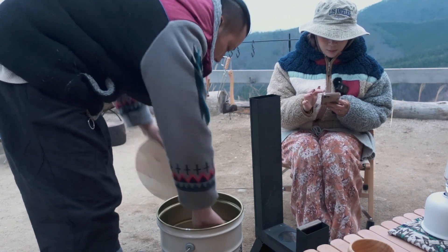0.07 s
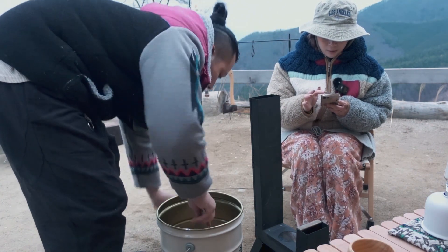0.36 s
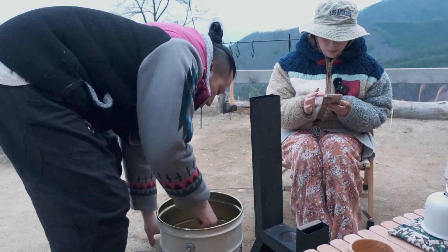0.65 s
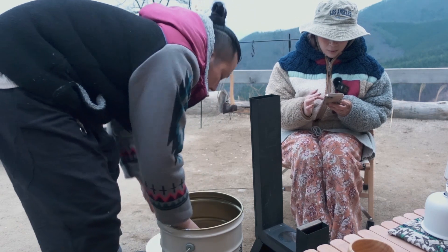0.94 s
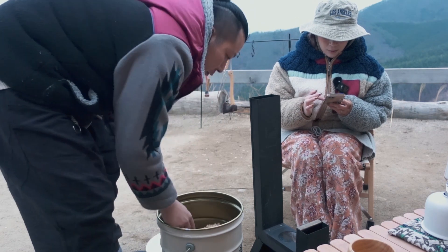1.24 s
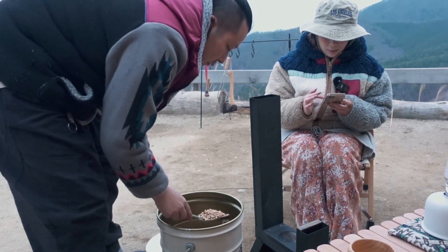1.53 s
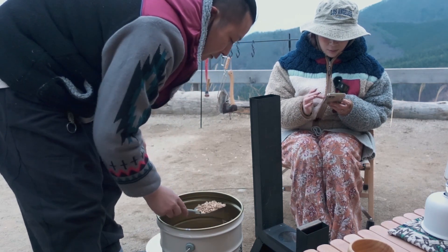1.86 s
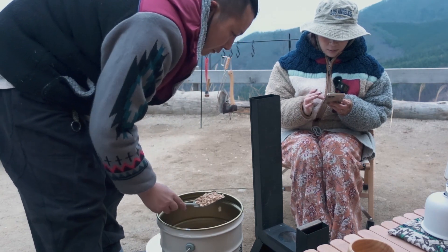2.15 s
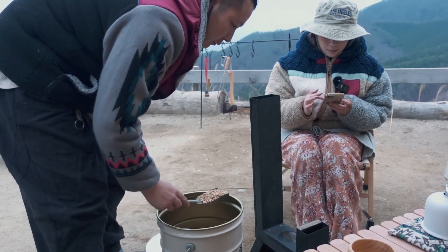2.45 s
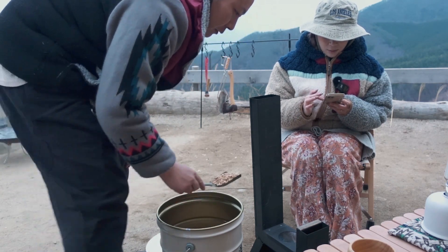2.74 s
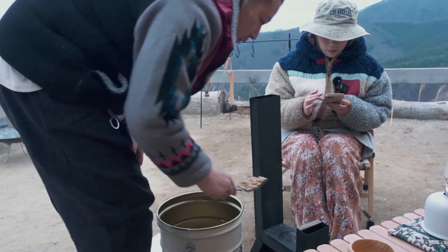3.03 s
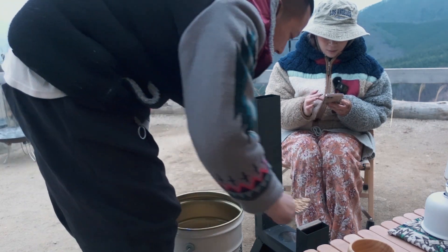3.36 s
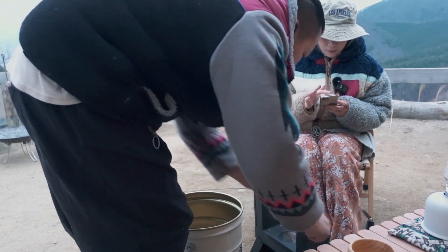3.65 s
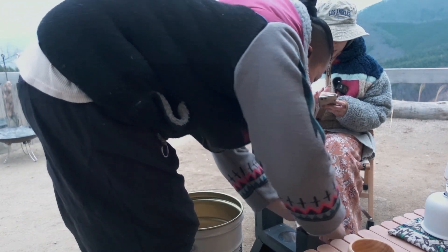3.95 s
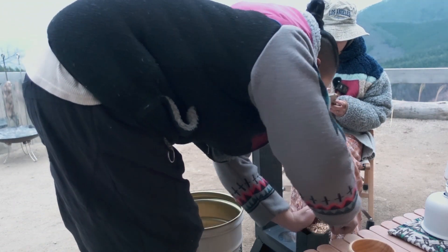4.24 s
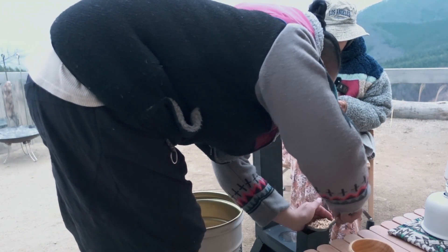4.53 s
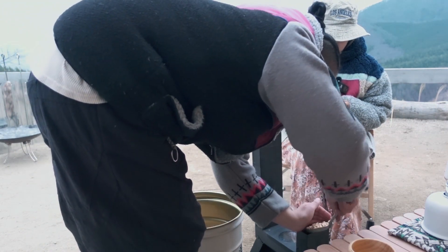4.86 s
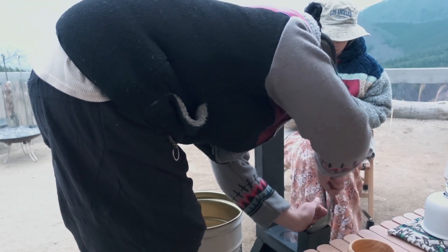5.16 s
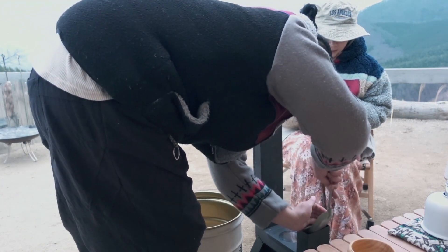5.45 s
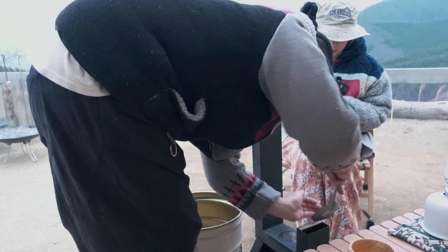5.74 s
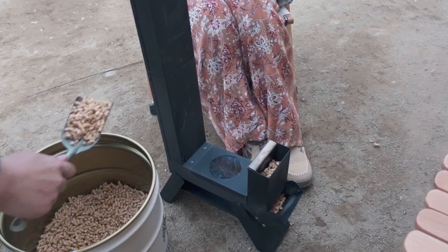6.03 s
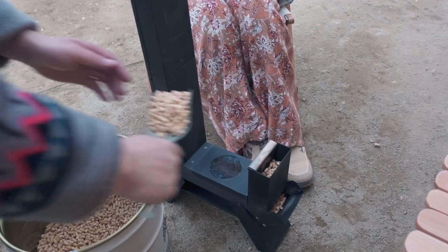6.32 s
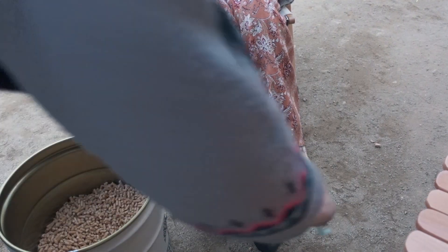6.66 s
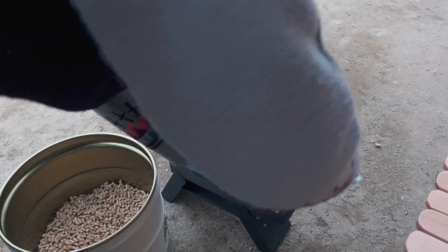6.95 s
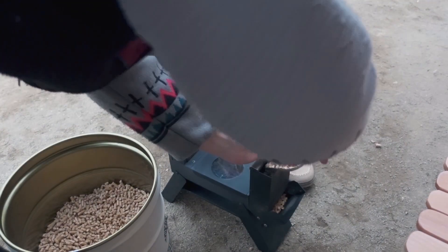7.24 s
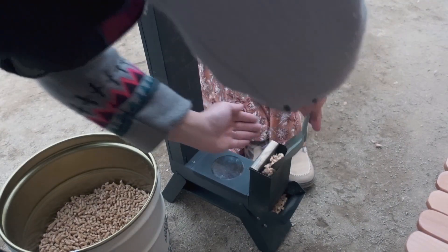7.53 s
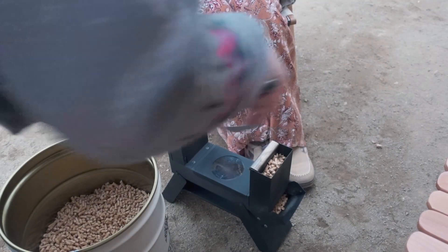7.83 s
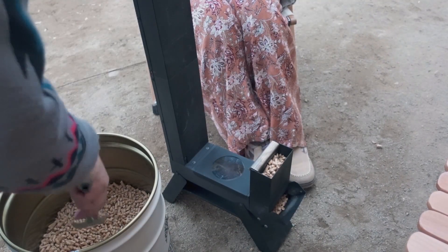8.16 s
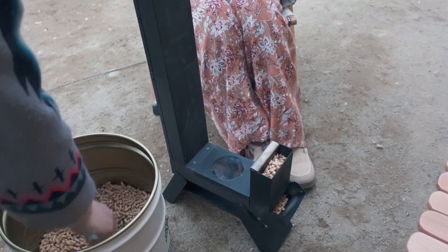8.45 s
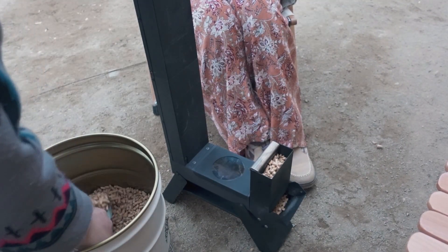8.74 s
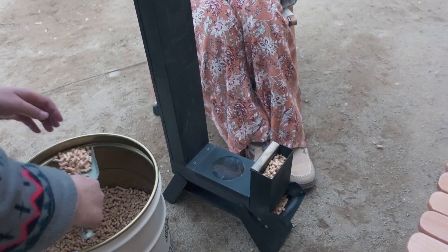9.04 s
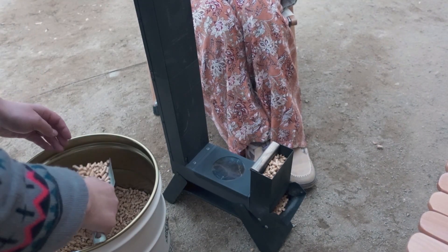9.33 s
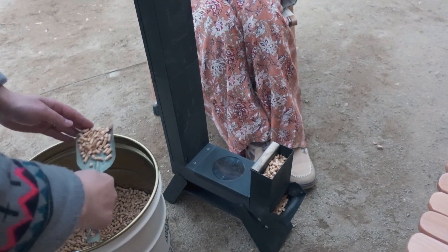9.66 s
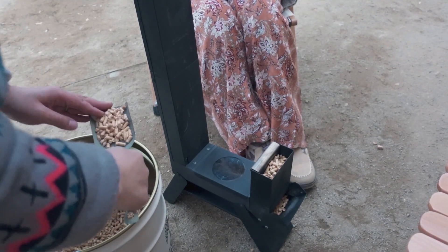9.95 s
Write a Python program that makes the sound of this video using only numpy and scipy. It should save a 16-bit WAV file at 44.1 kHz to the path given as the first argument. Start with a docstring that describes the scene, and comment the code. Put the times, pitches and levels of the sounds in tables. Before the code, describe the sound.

A metal scoop digs wood pellets from a steel pail and pours them rattling into a stove hopper, with jacket rustle outdoors.

```python
"""Outdoors, over faint open air, a small metal scoop digs wood pellets out of a steel pail: the pail booms,
the blade sings and the surplus trickles back onto the heap in a shower of tiny impacts. A jacket rustles
and shoes scuff on grit close by. A first scoopful slides into the sheet-steel hopper of a camp stove,
whose ringing modes shift and are damped as it fills. A second scoopful follows, then the scoop digs again."""
import sys
import numpy as np
from scipy import signal
from scipy.fft import rfft, irfft
from scipy.io import wavfile
from scipy.ndimage import uniform_filter1d, map_coordinates

SR = 44100
rng = np.random.default_rng(int(sys.argv[2]) if len(sys.argv) > 2 else 0)


def materialize(psi):
    """Save the field psi as 16-bit PCM at rate SR to the path in sys.argv[1].

    A 1-D psi becomes a single channel; in a 2-D psi each row is a channel.
    """
    bounded = np.clip(np.atleast_2d(psi).T, -1, 1)
    quanta = np.round(bounded * 32767).astype(np.int16)
    wavfile.write(sys.argv[1], SR, quanta)


N = 440559
TOP_HZ = 15900
TIME = np.arange(N) / SR
RING_TIME = TIME[:8192]

# Spectra of a cloth contact and of a blow on steel. Each row: frequency in Hz, relative level in dB.
FABRIC = [(59, -39.5), (100, -10.5), (189, -4), (234, -7.5), (295, -3.5), (662, -2.5), (1230, 0),
          (4670, -10), (15000, -30.5), (16000, -36)]
STEEL = [(120, -99), (200, -12.5), (491, -14.5), (548, -7), (1040, -0.5), (1250, 3.5), (2020, -1.5),
         (2610, 3.5), (3370, 1.5), (5330, 1), (5840, 0.5), (16000, -18.5)]
# Pushes through the heap. Each row: start and length in seconds, grind and boom in relative dB.
DIGS = [(0.657, 0.23, -14.5, -19), (0.9, 0.22, -26, -30.5), (8.4, 0.15, -16.5, -22),
        (8.61, 0.2, -21.5, -39), (8.82, 0.036, -14.5, -28), (8.92, 0.028, -18.5, -55)]
# Modes of the hopper with pellets in it. Each row: frequency and base width in Hz, weight in dB.
FILLED_HOPPER = [(846, 18, -3), (1185, 58, -1), (1640, 77, 3.5), (2300, 91, 1), (2736, 44, 5.5),
                 (3613, 5.1, 9.5), (4480, 61, 1), (5200, 35, 8.5), (5470, 36, -1.5), (5865, 32, -9),
                 (7100, 20, -13)]


def undb(db):
    """Decibels to amplitude ratio."""
    return 10 ** (np.asarray(db) / 20)


def unit(x):
    """Normalisation to rms 1."""
    return x / np.sqrt(np.mean(x ** 2) + 1e-20)


def peak(x, db):
    """Normalisation of a hit: its loudest two milliseconds get this level."""
    return x * undb(db) / np.sqrt(uniform_filter1d(x ** 2, size=88).max())


def add(track, s, sound):
    """Superposition of a sound on a track, from second s."""
    start = max(int(s * SR), 0)
    track[start:start + len(sound)] += sound[:N - start]


def colour(x, spectrum):
    """Minimum-phase filtering to a (Hz, dB) spectrum, which keeps attacks sharp."""
    hz, db = np.transpose(spectrum)
    grid = np.fft.rfftfreq(2048, 1 / SR)
    gain = undb(np.interp(np.log(grid + 1), np.log(hz), db))
    cepstrum = irfft(np.log(gain))
    half = len(cepstrum) // 2
    folded = np.r_[cepstrum[0], 2 * cepstrum[1:half], np.zeros(half)]
    return signal.oaconvolve(x, irfft(np.exp(rfft(folded))))[:len(x)]


def resonate(x, hz, width_hz):
    """A second-order resonance with gain 1 at its centre."""
    hz, width_hz = min(hz, .45 * SR), min(width_hz, .4 * SR)
    return signal.lfilter(*signal.iirpeak(hz, hz / width_hz, fs=SR), x)


def drift(hold):
    """Smooth random motion: straight lines between values drawn every `hold` samples."""
    steps = np.repeat(rng.standard_normal(N // hold + 1), hold)
    return unit(uniform_filter1d(steps, size=hold))[:N]


def wander(x, depth):
    """Frequency modulation: all pitches bend by a slow random fraction."""
    return map_coordinates(x, [np.cumsum(1 + depth * drift(2500))], order=3, mode="mirror")


def crack(spectrum, t60, tail_db, tail_t60):
    """An impact transient: a short burst and its weaker reflections, both decaying exponentially."""
    fall = undb(-60 * RING_TIME / t60) + undb(tail_db - 60 * RING_TIME / tail_t60)
    return unit(colour(rng.standard_normal(len(fall)) * fall, spectrum))


def ring(modes, damping, spread=0.87):
    """Free vibration: each mode takes a random share of the blow; damping multiplies its width."""
    hz, width, db = np.transpose(modes)[:, :, None]
    share = (1 + spread * rng.standard_normal(hz.shape)) * rng.choice([-1, 1], hz.shape)
    waves = np.exp(-np.pi * width * damping * RING_TIME) * np.cos(2 * np.pi * hz * RING_TIME)
    return unit(np.sum(share * width * undb(db) * waves, axis=0))


def shower(contact, per_s, scatter_db, clump_db, count=10):
    """Shot noise: random contacts of uneven size, bunched in little avalanches, at a steady rms of 1."""
    clumps = drift(300)
    size = undb(scatter_db * np.minimum(rng.exponential(size=N), 3.2) + clump_db * clumps)
    blows = (rng.random(N) < per_s / SR) * size * rng.choice([-1, 1], N)
    # neighbouring contacts land on nearly the same spot, so the colour shifts from clump to clump
    patch = np.repeat(rng.integers(count, size=N // 1400 + 1), 1400)[:N]
    spot = (patch + rng.integers(3, size=N)) % count
    sound = sum(signal.oaconvolve(blows * (spot == k), contact())[:N] for k in range(count))
    power = uniform_filter1d(uniform_filter1d(sound ** 2, size=1500), size=1500)
    return sound / np.sqrt(np.abs(power) + 1e-12)


def tumble(contact, first_db, fall_db, spread_s, count):
    """A collision cascade: one pellet knocks its neighbours loose, each later and weaker."""
    out = np.zeros(N)
    add(out, 0, contact())
    for k, s in enumerate(np.sort(spread_s * rng.gamma(2, size=count))):
        add(out, s, undb(first_db + fall_db * k) * contact())
    return out[:2 * len(RING_TIME)]


def strokes(rows, attack_s, sag_db, release_s, column=2):
    """Envelopes summed in power: each rises, sags over its length, then falls 20 dB per release_s."""
    power = np.zeros(N)
    for row in rows:
        s, length = row[:2]
        age = TIME[:int((length + 3 * release_s) * SR)]
        sag = sag_db * np.minimum(age / length, 1)
        release = 20 * np.maximum(age - length, 0) / release_s
        gain = np.minimum(age / attack_s, 1) * undb(row[column] - sag - release)
        add(power, s, gain ** 2)
    return np.sqrt(power)


def gesture(curves):
    """A smoothed envelope along (seconds, dB) curves, silent between them."""
    gain = np.zeros(N)
    for s, db in map(np.transpose, curves):
        gain += undb(np.interp(TIME, s, db, left=-200, right=-200))
    return uniform_filter1d(gain, size=200)


def open_air():
    """Ambient noise: a faint broadband floor and a distant narrow-band drone."""
    # Outdoor spectrum. Each row: frequency in Hz, relative level in dB.
    air = [(15, -51), (25, -22), (53, -18.5), (70, -3.5), (82, -21), (102, -16), (130, -12), (242, -2),
           (489, -11), (2220, -11.5), (16000, -32)]
    drone = resonate(resonate(rng.standard_normal(N), hz=100.4, width_hz=6.1), hz=98.3, width_hz=15)
    return undb(-46) * unit(colour(rng.standard_normal(N), air)) + undb(-59.5) * unit(drone)


def jacket():
    """Friction: cloth fibres catch and slip, and a sleeve hisses most where it moves fastest."""
    # Body movements. Each row: start and length in seconds, relative level in dB.
    rubs = [(0, 1.5, -40.5), (2.61, 0.92, -42), (3.62, 2.09, -38), (6.1, 2.48, -36.5), (9.82, 0.17, -38.5)]
    # Arm swings. Each row: fastest moment and length in seconds, relative level in dB.
    swings = [(0.22, 0.66, -21), (2.98, 0.062, -33.5), (3.82, 0.22, -28), (6.48, 0.067, -33),
              (8.08, 0.46, -32.5)]
    fibres = shower(lambda: crack(FABRIC, t60=0.0064, tail_db=-16, tail_t60=0.045),
                    per_s=3000, scatter_db=2, clump_db=1, count=12)
    swish = unit(resonate(resonate(rng.standard_normal(N), hz=3600, width_hz=5800), 3600, 6100))
    arm = sum(undb(db) * np.exp(-2 * ((TIME - s) / length) ** 2) for s, length, db in swings)
    rub = strokes(rubs, attack_s=0.042, sag_db=-0.4, release_s=1) + undb(-16.5) * arm
    return undb(1.44) * fibres * rub + undb(-14) * swish * arm


def footsteps():
    """Granular friction: grit crackles under the soles, over the dull push of the tread."""
    # Scuffs. Each row: start and length in seconds, grit and tread in relative dB.
    steps = [(0.025, 0.13, -41, -64), (2.89, 0.11, -37.5, -49), (3.18, 0.06, -39.5, -58),
             (6.38, 0.14, -33, -44.5), (7.97, 0.15, -37, -53)]
    # Spectrum of one grain. Each row: frequency in Hz, relative level in dB.
    grain = [(210, -55), (350, -4.5), (490, -8.5), (593, -5.5), (1280, 2), (2000, -9.5), (3560, -10.5),
             (16000, -44)]
    grit = shower(lambda: crack(grain, t60=0.0032, tail_db=-11, tail_t60=0.055),
                  per_s=700, scatter_db=3.5, clump_db=-3.5, count=6)
    tread = unit(resonate(resonate(rng.standard_normal(N), hz=227, width_hz=110), hz=210, width_hz=250))
    scuff = strokes(steps, attack_s=0.03, sag_db=0, release_s=0.14)
    weight = strokes(steps, attack_s=0.05, sag_db=6.5, release_s=0.14, column=3)
    return undb(7) * grit * scuff + undb(13) * tread * weight


def dry_ticks():
    """Heavily damped resonance: grit and clothing give small dry ticks."""
    # Each row: time in seconds, relative peak in dB, centre in Hz.
    ticks = [(0.041, -16, 1100), (2.17, -24.5, 8400), (2.202, -22, 10300), (3.147, -24.5, 1330),
             (3.934, -23, 1100), (6.396, -17.5, 1280), (6.559, -22, 1300), (8.13, -20, 1300)]
    out = np.zeros(N)
    for s, db, hz in ticks:
        click = crack(FABRIC, t60=0.0013, tail_db=-18.5, tail_t60=0.051)
        add(out, s, peak(resonate(click, hz, width_hz=0.3 * hz), db - 0.5))
    return out


def scoop_motion():
    """Excitation envelopes: a push bites at once, a spill runs out, a shake builds up."""
    # Slides off the scoop, and shakes of it. Each row: start and length in seconds, relative level in dB.
    spills = [(0.208, 0.047, -18.5), (1.09, 0.15, -23), (1.195, 0.23, -16), (1.43, 0.16, -15.5),
              (1.6, 0.071, -16.5), (8.972, 0.21, -13.5), (9.19, 0.11, -20), (9.275, 0.07, -15),
              (9.643, 0.12, -18.5)]
    shakes = [(0.335, 0.05, -19), (1.7, 0.17, -21.5), (1.93, 0.077, -30), (2.315, 0.058, -37.5),
              (9.475, 0.084, -24)]
    dig = strokes(DIGS, attack_s=0.0076, sag_db=3, release_s=0.07)
    spill = strokes(spills, attack_s=0.0061, sag_db=4, release_s=0.056)
    shake = strokes(shakes, attack_s=0.032, sag_db=1.3, release_s=0.07)
    return dig, spill, shake


def heap_contact(ring_db, tail_db, hz=5500, spread=0.462, width_hz=70):
    """Rod vibration: wood clicks on wood and the pellets tinkle, each at a pitch set by its length."""
    # Spectrum of the click. Each row: frequency in Hz, relative level in dB.
    wood = [(210, -118), (350, -22), (685, -20), (817, -11), (1500, -10), (1880, -13), (2170, -8),
            (2840, 1.5), (3670, -6), (5750, 10.5), (7430, -7), (12000, -15.5), (16000, -47)]
    pitches = np.minimum(hz * np.exp(spread * rng.triangular(-1, 0, 1, size=4)), TOP_HZ)
    tinkle = ring([(pitch, width_hz, 0) for pitch in pitches], damping=1)
    return crack(wood, t60=0.022, tail_db=tail_db, tail_t60=0.12) + undb(ring_db) * tinkle


def scoop_contact(ring_db):
    """Impact excitation: a pellet sets the thin blade of the scoop ringing."""
    # Spectrum of the impact. Each row: frequency in Hz, relative level in dB.
    clatter = [(240, -23), (400, -52), (949, -11.5), (1070, -16), (1180, -10.5), (1730, -1.5), (3470, -5.5),
               (4580, 1), (10400, -8), (16000, -33)]
    # Modes of the scoop. Each row: frequency and base width in Hz, weight in dB.
    modes = [(1870, 185, -0.5), (2760, 240, -1.5), (4635, 59, 9.5), (5170, 110, 6), (6100, 7.8, -15),
             (7000, 70, -15), (7300, 27, 4), (7920, 120, 6), (8530, 92, -5), (9940, 34, -9), (10100, 68, 2),
             (11350, 130, -6)]
    click = crack(clatter, t60=0.0033, tail_db=-1.5, tail_t60=0.074)
    return click + undb(ring_db) * ring(modes, damping=1.25)


def spilling(dig, spill, shake):
    """Granular flow: pellets rattle over the blade and rain on the heap; crumbs tick high above them."""
    rain = shower(lambda: heap_contact(ring_db=-5, tail_db=-15, spread=0.7),
                  per_s=640, scatter_db=7.5, clump_db=-0.5, count=20)
    rattle = shower(lambda: scoop_contact(ring_db=0.5), per_s=280, scatter_db=2.5, clump_db=8.5)
    crumbs = shower(lambda: heap_contact(ring_db=-1.5, tail_db=-25, hz=9020, spread=0.52, width_hz=97),
                    per_s=120, scatter_db=16, clump_db=2)
    return (undb(-0.5) * rain * spill
            + rattle * (undb(3) * shake + undb(-7) * spill)
            + undb(-15) * crumbs * (spill + undb(9.5) * shake + dig))


def inside_pail(x, echo_db=-19, t60=0.72):
    """Reverberation: sound lingers a moment between the steel walls of the pail."""
    echo = colour(rng.standard_normal(len(RING_TIME)), STEEL) * undb(-60 * RING_TIME / t60)
    return x + undb(echo_db) * signal.oaconvolve(x, echo / np.sqrt(np.sum(echo ** 2)))[:N]


def pellet_snaps():
    """Collision cascades in the heap: single pellets snap or land and unsettle others."""
    # Each row: time in seconds, relative peak in dB.
    snaps = [(0.2193, -0.5), (0.4646, -1.5), (0.4969, 1.5), (0.507, -1.5), (0.5393, -1), (0.659, -1.5),
             (0.689, -8), (1.1977, -1.5), (1.2916, 2.5), (1.4352, 0), (1.523, 2.5), (2.0642, -4),
             (2.076, -2.5), (8.973, 4.5), (9.2098, -3), (9.3265, -4), (9.643, 4), (9.8171, -4)]
    out = np.zeros(N)
    for s, db in snaps:
        snap = tumble(lambda: heap_contact(ring_db=-4.5, tail_db=-12.5),
                      first_db=-8.5, fall_db=-1, spread_s=0.0065, count=7)
        add(out, s, peak(snap, db - 9.5))
    return out


def blade_ring(hz=4630, width_hz=45):
    """Stick-slip friction: the edge drags along the pail and keeps one high mode of the blade ringing."""
    # Each row: start and length in seconds, relative level in dB.
    drags = [(0.33, 0.23, -32), (0.66, 0.13, -26), (8.41, 0.093, -23), (8.63, 0.08, -28)]
    catches = shower(lambda: ring([(hz, width_hz, 0)], damping=1),
                     per_s=120, scatter_db=1, clump_db=2.5, count=3)
    return wander(catches, depth=0.006) * strokes(drags, attack_s=0.019, sag_db=2, release_s=0.13)


def scoop_clinks():
    """Hard impacts: a few pellets in quick succession excite the bright modes of the scoop."""
    # Each row: time in seconds, relative peak in dB.
    clinks = [(0.3783, -11), (1.721, -6), (1.7875, -3), (2.1862, -15), (2.6267, -21.5), (5.9594, -20.5),
              (6.3285, -11), (8.6351, 1), (8.6595, -2), (8.6892, 0), (8.769, -2), (8.8052, -6),
              (8.9102, 1.5), (9.377, -2), (9.4055, -2), (9.5332, -0.5), (9.5542, -6.5)]
    out = np.zeros(N)
    for s, db in clinks:
        clink = tumble(lambda: scoop_contact(ring_db=-0.5),
                       first_db=-7.5, fall_db=-8.5, spread_s=0.002, count=3)
        add(out, s, peak(clink, db - 7.5))
    return out


def pail_bumps():
    """Contact stiffness: the softer the scoop bumps the pail, the lower the modes in its hollow note."""
    # Each row: time in seconds, relative peak in dB, centre of the excited band in Hz.
    bumps = [(0.468, -6, 210), (0.877, -2, 930), (0.893, -3, 440), (1.004, -2, 640), (1.062, -13, 1100),
             (8.908, -18.5, 500), (8.92, -33, 805)]
    # Modes of the loaded pail. Each row: frequency and base width in Hz, weight in dB.
    modes = [(180, 180, 1.5), (243, 40, 8.5), (293, 24, 16.5), (407, 110, -2), (686.4, 19, 7),
             (759, 63, 2.5), (1100, 17, 0), (1370, 44, -20), (1490, 29, 1)]
    out = np.zeros(N)
    for s, db, hz in bumps:
        note = ring(modes, damping=0.62, spread=0.3)
        blow = undb(-0.5) * crack(STEEL, t60=0.034, tail_db=-12, tail_t60=0.089)
        add(out, s, peak(resonate(note + blow, hz, width_hz=0.7 * hz), db - 0.9))
    return out


def digging(dig, spill, shake):
    """Forced vibration: pellets grind past the blade, whose pitch wavers, and shake the pail's bottom."""
    # Spectrum of pellets grinding. Each row: frequency in Hz, relative level in dB.
    crunch = [(210, -46), (350, -8), (404, -5.5), (707, -8), (1600, 6), (2170, -5), (2710, 5), (3500, 2.5),
              (4670, 5.5), (7080, -3.5), (10400, -8.5), (16000, -29.5)]
    # Modes of the scoop sunk in the heap. Each row: frequency and base width in Hz, weight in dB.
    modes = [(1600, 48, 0), (2167, 240, 5.5), (2660, 44, -6), (4470, 58, 11.5)]
    grind = shower(lambda: crack(crunch, t60=0.004, tail_db=-4.5, tail_t60=0.029),
                   per_s=1000, scatter_db=5.5, clump_db=4)
    blade = shower(lambda: ring(modes, damping=0.52), per_s=170, scatter_db=-4, clump_db=4, count=6)
    scrape = wander(blade, depth=0.051)
    boom = unit(resonate(resonate(rng.standard_normal(N), hz=255, width_hz=95), hz=271, width_hz=186))
    sinking = strokes(DIGS, attack_s=0.12, sag_db=5, release_s=0.13, column=3)
    boom_gain = sinking + undb(-27) * spill + undb(-24) * shake
    return (undb(1.5) * grind + undb(-6) * scrape) * dig + boom * boom_gain


def scoop_clacks(mode_hz=1860):
    """Soft impact: the whole load drops against the blade and excites only the scoop's lowest mode."""
    # Each row: time in seconds, relative peak in dB.
    clacks = [(1.825, -15), (8.77, -11.5), (9.046, -9.5), (9.281, -14), (9.374, -13.5), (9.487, -19),
              (9.53, -11.5), (9.554, -15)]
    out = np.zeros(N)
    for s, db in clacks:
        blow = tumble(lambda: scoop_contact(ring_db=3), first_db=-2.5, fall_db=-1, spread_s=0.004, count=3)
        clack = resonate(resonate(blow, mode_hz, width_hz=330), mode_hz, width_hz=700)
        add(out, s, peak(clack, db - 4))
    return out


def hopper_contact(modes, ring_db, damping, cutoff_hz=11500):
    """Plate vibration: a pellet strikes the steel hopper; a gentle low-pass softens the very top."""
    blow = crack(STEEL, t60=0.013, tail_db=-3, tail_t60=0.098)
    walls = undb(ring_db) * ring(modes, damping, spread=0.5)
    return signal.sosfilt(signal.butter(2, cutoff_hz, fs=SR, output="sos"), blow + walls)


def pouring():
    """Loading and damping: the empty hopper rings brightly until pellets damp it and shift its modes."""
    # Modes of the empty hopper. Each row: frequency and base width in Hz, weight in dB.
    empty_hopper = [(563, 28.5, -1.5), (965, 16, -14), (1245, 33, -2), (1394, 18, -3.5), (1648, 115, -4.5),
                    (2600, 95, 1.5), (3045, 27, -8), (4020, 9.1, -3), (3930, 124, -3.5), (4290, 27, -2.5),
                    (4870, 85, -1.5), (5130, 31, -7.5), (5404, 8.9, 12), (6120, 21, -27), (6180, 36, -6),
                    (7730, 14, -4), (8450, 28, -8), (9130, 94, -11), (10300, 64, -17)]
    # Pellets slipping in ahead of a pour. Each row: start and length in seconds, level in dB.
    dribbles = [(4.65, 0.13, -35), (7.15, 0.029, -27), (7.25, 0.035, -22.5)]
    # Flow curves, two for the first pour. Each row of a curve: time in seconds, relative level in dB.
    first_pour = [
        [(4.83, -24), (4.842, -16), (4.87, -11), (5.11, -16), (5.14, -20)],
        [(5.15, -13), (5.456, -13), (5.67, -24.5), (5.734, -43), (5.74, -45)],
    ]
    second_pour = [(7.32, -35), (7.428, -21.5), (7.666, -14.5), (7.688, -25.5), (7.752, -19.5), (7.8, -37)]
    empty = shower(lambda: hopper_contact(empty_hopper, ring_db=5, damping=0.72),
                   per_s=650, scatter_db=2, clump_db=2, count=16)
    filled = shower(lambda: hopper_contact(FILLED_HOPPER, ring_db=2.5, damping=0.91),
                    per_s=650, scatter_db=5, clump_db=3)
    fill = np.interp(TIME, [5.42, 5.85], [0, 1])
    dribble = strokes(dribbles, attack_s=0.0086, sag_db=2.5, release_s=0.031)
    flow = undb(-0.4) * gesture(first_pour) + undb(-1.3) * gesture([second_pour]) + dribble
    return flow * (np.sqrt(1 - fill) * empty + np.sqrt(fill) * wander(filled, depth=0.0053))


def rim_knocks():
    """Damped impacts: the scoop and single pellets hit the hopper's rim, and one mode rings briefly."""
    # Each row: time in seconds, relative peak in dB, ringing frequency in Hz.
    knocks = [(4.708, -18, 1700), (4.743, -14.5, 1880), (4.79, -10, 2700), (5.148, -21, 2400),
              (6.199, -20.5, 1090), (7.0, -8, 1500), (7.22, -13, 2700), (7.251, -9, 2130),
              (7.433, -12, 1810), (7.627, -18, 2250)]
    hand_damping = undb(-60 * RING_TIME / 0.82)
    out = np.zeros(N)
    for s, db, hz in knocks:
        blow = hopper_contact(FILLED_HOPPER, ring_db=-25, damping=0.94, cutoff_hz=13600) * hand_damping
        note = undb(-5.5) * ring([(hz, 70, 0)], damping=0.67)
        add(out, s, peak(blow + note, db - 0.5))
    return out


def scene():
    """Superposition of all sources at one microphone."""
    around = open_air() + jacket() + footsteps() + dry_ticks()
    motion = scoop_motion()
    pail = inside_pail(spilling(*motion) + pail_bumps() + digging(*motion))
    scoop = pellet_snaps() + blade_ring() + scoop_clinks() + scoop_clacks()
    hopper = pouring() + rim_knocks()
    return (around + pail + scoop + hopper)[None]


def record(dry):
    """Clipping and band limiting: peaks flatten at full scale, then the top is cut."""
    clipped = np.clip(dry, -1, 1)
    return signal.sosfilt(signal.ellip(10, .2, 70, TOP_HZ, fs=SR, output="sos"), clipped)


dry = scene()
out = record(dry)
materialize(out)
```